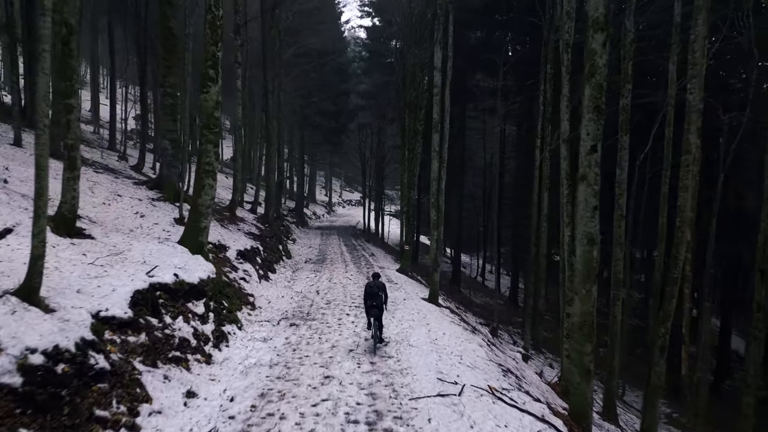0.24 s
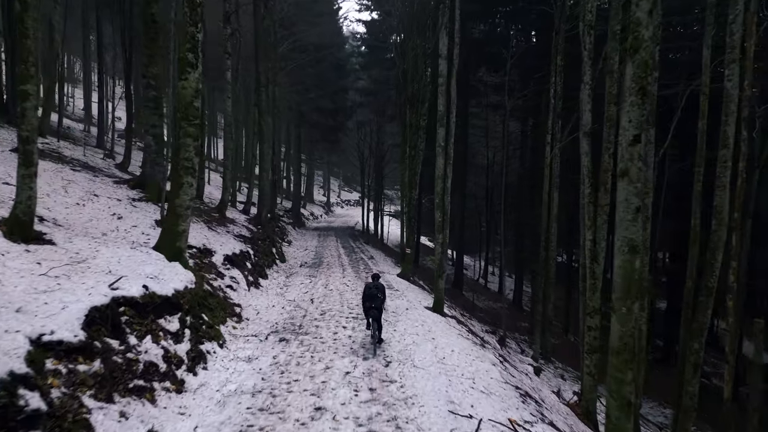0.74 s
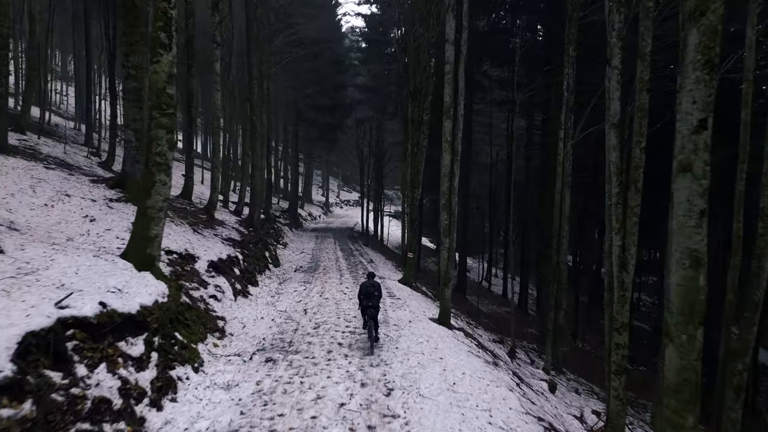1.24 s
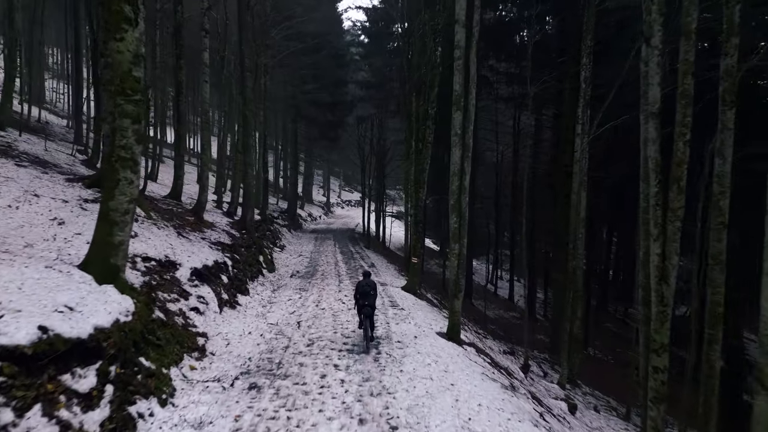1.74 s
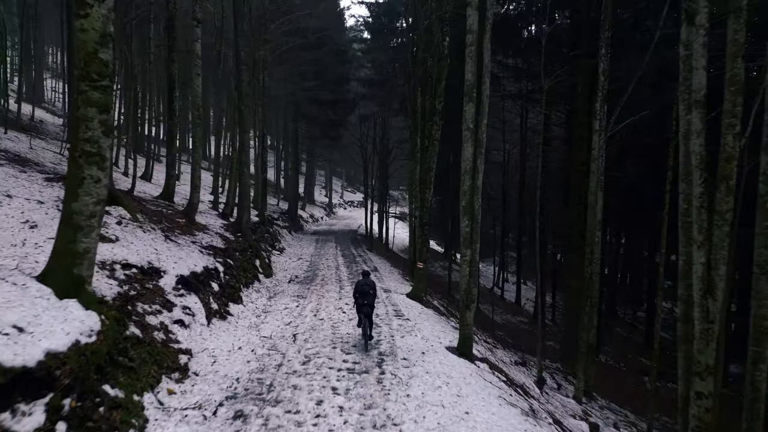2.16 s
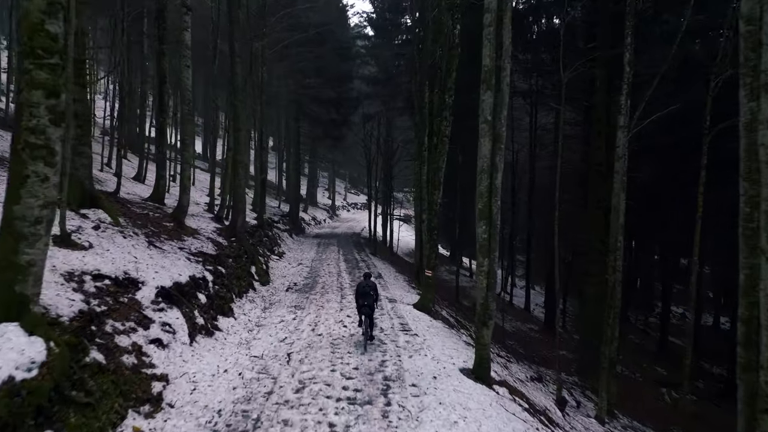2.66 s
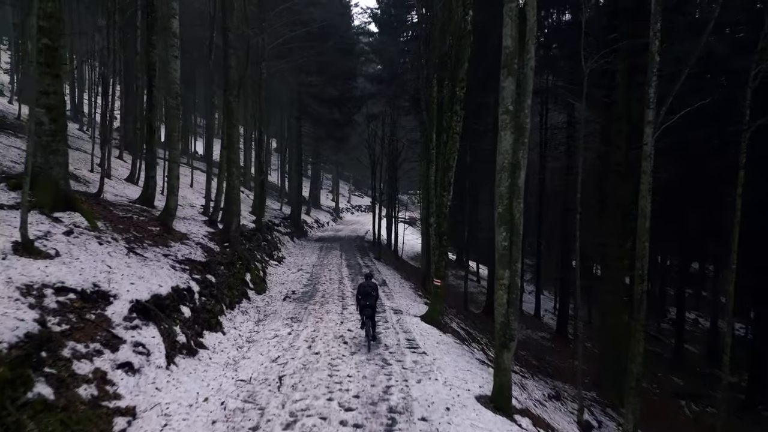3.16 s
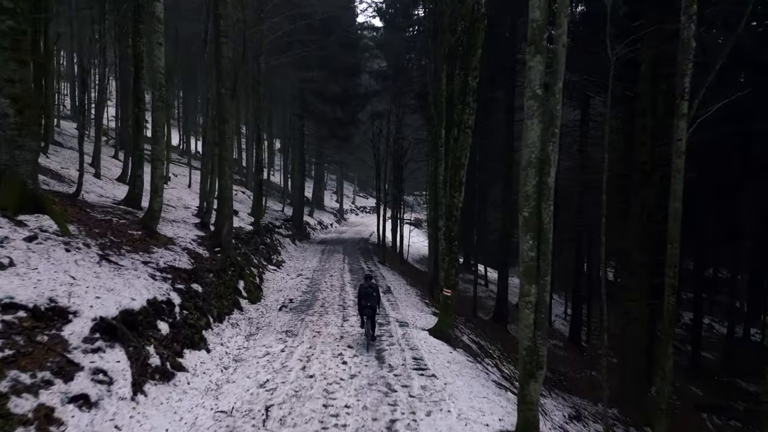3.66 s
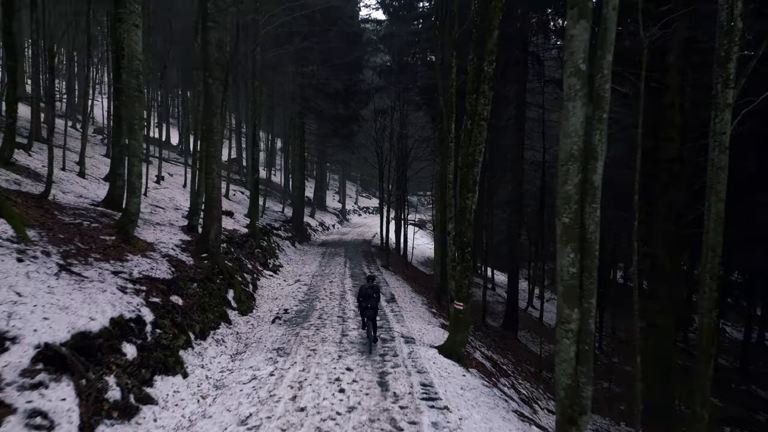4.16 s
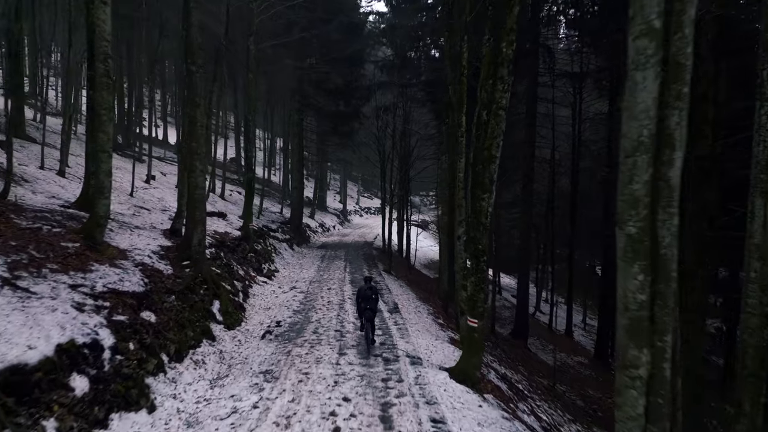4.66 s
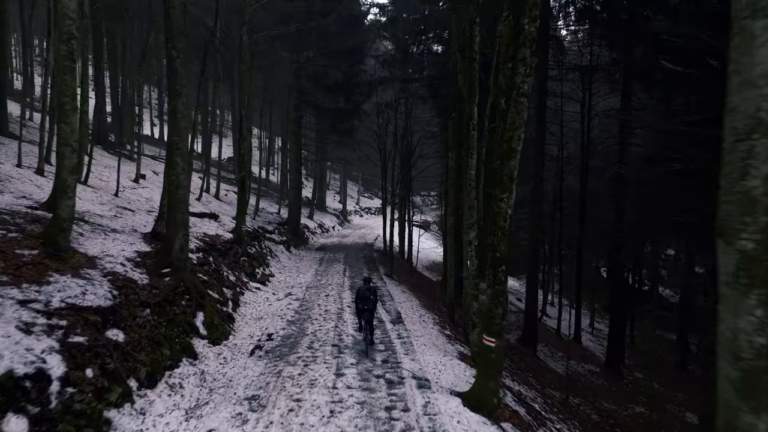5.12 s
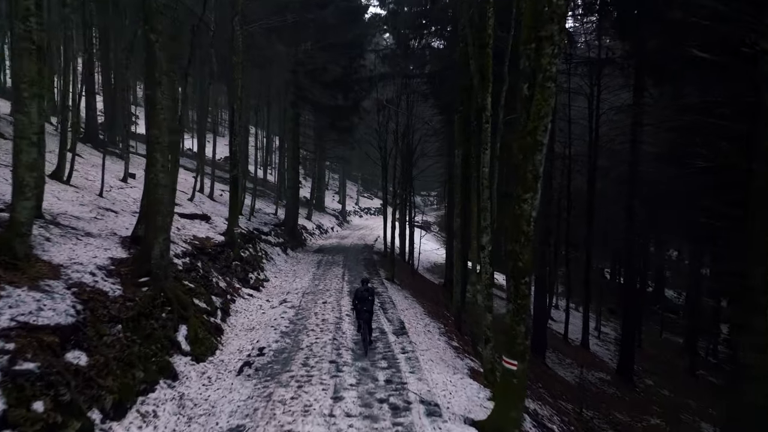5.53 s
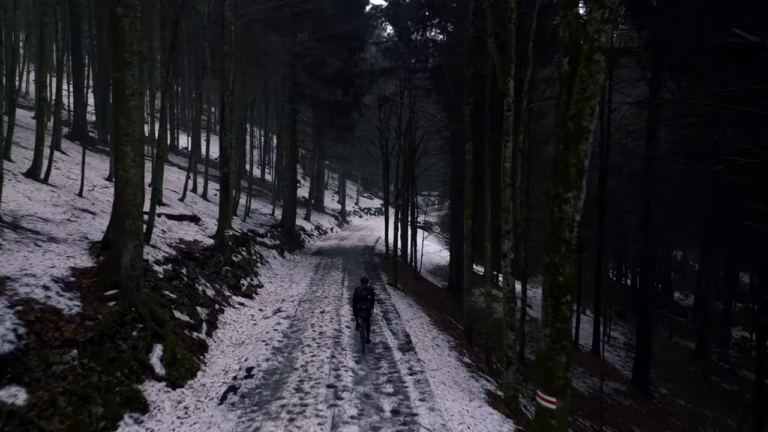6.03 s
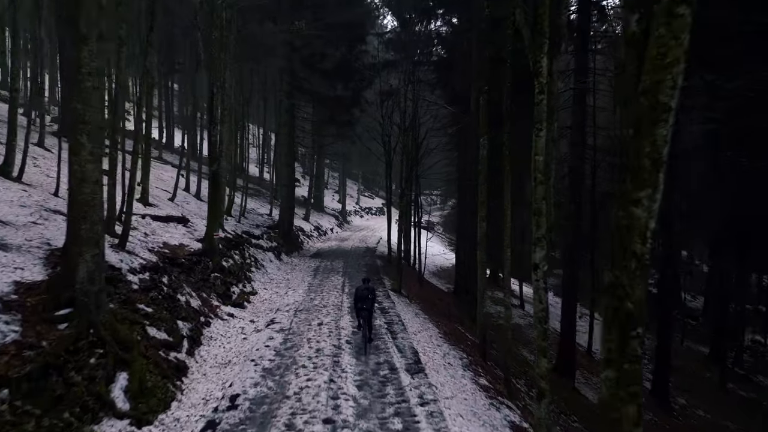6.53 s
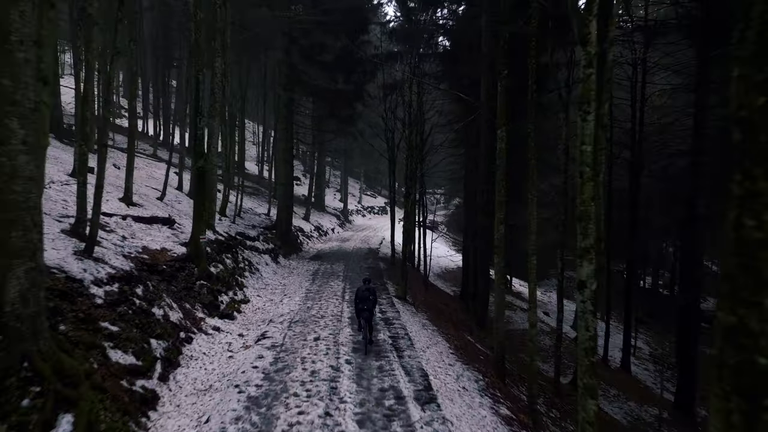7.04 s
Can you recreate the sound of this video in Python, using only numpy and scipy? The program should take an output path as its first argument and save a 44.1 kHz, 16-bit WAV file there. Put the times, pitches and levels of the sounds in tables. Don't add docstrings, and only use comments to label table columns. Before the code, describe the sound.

A bicycle rolls along a snowy forest track, heard from a small microphone on the frame. Heavy crunching and sharp crust cracks open loudly, then drop to a softer, continuous grainy hiss with fast freewheel ticking. Irregular low wind thumps buffet the microphone. Crunching grows again toward the end, with scattered ice snaps.

```python
import sys
import numpy as np
from scipy import signal
from scipy.fft import rfft, irfft
from scipy.io import wavfile
from scipy.ndimage import uniform_filter1d

SR = 44100
rng = np.random.default_rng(int(sys.argv[2]) if len(sys.argv) > 2 else 0)


def inscribe(sig):
    pcm = np.round(np.clip(np.atleast_2d(sig).T, -1, 1) * 32767)
    wavfile.write(sys.argv[1], SR, pcm.astype(np.int16))


def gain_from_db(level_db):
    decades = np.asarray(level_db, float) / 20
    return 10 ** decades


N = 321048

# start_s, load_db, coarseness_db
TRACK_LOAD = [(0.0, -25.5, 4), (0.32, -25, 5), (0.45, -28, 2.5), (0.6, -25.5, -0.5), (0.695, -28, 2),
              (0.72, -36, 2.5), (1.05, -36, 2), (1.27, -37, -0.5), (1.84, -38, 4.5), (2.3, -37.5, -2.5),
              (3.35, -36, 1), (3.6, -33.5, -1), (4.7, -33.5, 0.5), (5.2, -33, 0), (5.95, -29.5, -1.5),
              (6.3, -31.5, 1.5), (6.8, -33.5, -0.5), (7.28, -34.5, 3)]
# centre_s, half_length_s, load_db, coarseness_db
SNOW_PATCHES = [(0.16, 0.027, -3.5, -3), (.03, .03, 2.5, 0.5), (.11, 0.018, 0, 2), (.2, 0.033, 0.5, 2.5),
                (.33, 0.018, 0.5, 1.5), (.265, .012, -4.5, 11), (1.42, .02, -1.5, 2.5),
                (1.37, 0.039, 4.5, 3.5), (2.0, 0.045, 0.5, 3), (2.45, 0.055, -1.5, 0.5),
                (2.65, 0.028, 0, 3.5), (5.41, 0.015, 3, -2), (3.25, 0.042, -0.5, 0), (4.0, 0.034, 2, -0.5),
                (4.58, .04, -1, -1), (5.605, .02, -3, 1), (5.28, 0.034, -2.5, -2), (5.55, 0.063, -1, -0.5),
                (6.15, .05, 0.5, 1), (7.05, .05, 1, -1), (0.49, 0.012, -3, 2), (0.28, 0.012, -13, -4),
                (0.378, 0.028, -11, -1.5), (0.08, 0.047, 0, 2.5), (0.91, 0.017, 6, -8),
                (1.02, 0.036, 4.5, -0.5), (1.292, 0.026, 5.5, 6), (1.56, 0.031, 8, 3), (1.65, .025, -3, -8),
                (1.71, 0.083, 2.5, 0), (3.62, 0.016, -0.5, 4), (4.17, 0.03, -3, 0.5), (3.8, 0.02, 5, -3.5),
                (4.4, 0.025, 3, -0.5), (4.83, 0.029, -4.5, 1), (4.89, 0.025, 0.5, 1.5),
                (4.99, 0.022, 4.5, -1.5), (5.95, 0.054, -1.5, 6.5), (5.39, 0.09, 2.5, 1.5),
                (6.55, .025, -2.5, 2.5), (5.79, 0.081, 1, 1.5), (5.88, 0.042, -3, 1.5), (6.42, 0.01, 6, 0),
                (6.47, 0.017, -3.5, -2), (6.6, 0.093, 3.5, 1), (6.68, 0.012, -2.5, -2),
                (6.73, 0.015, 2, 5.5), (6.93, 0.021, 2, 1), (7.27, 0.0092, 3, 3.5)]
# start_s, level_db
LOOSE_POWDER = [(0.0, 2), (0.52, 0.9), (0.6, -4.5), (0.69, 3), (0.72, 1), (1.03, 1.4), (1.2, 0),
                (1.5, -0.6), (1.72, 1.5), (1.88, -1.5), (2.4, 1.3), (3.8, -0.8), (4.75, 1.3), (4.95, -2),
                (5.2, 1.3), (5.65, -1.3), (6.3, -0.5), (7.28, 0)]
# centre_s, half_length_s, level_db
SPRAY_PUFFS = [(.25, .02, 3), (.74, .02, -2.5), (.98, 0.018, -2), (1.11, 0.013, 3), (1.56, .025, -5),
               (1.8, .02, 2.5), (1.91, .015, -5), (2.39, .03, -4.5), (2.73, .02, -3), (3.01, .02, -2),
               (4.62, .03, -3.5), (5.65, .035, -3), (5.75, .02, 2)]
# frequency_hz, density_db (per Hz)
BODY_SPECTRUM = [(120, -16.5), (220, -5), (400, -1.5), (600, -2), (1000, -2), (1550, -6.5), (2500, -25.5)]
# frequency_hz, density_db (per Hz)
CRUST_SPECTRUM = [(700, -27.5), (1200, -8), (1700, -2), (2500, -2.5), (3100, -3.5), (3800, -6.5),
                  (5000, -13), (7000, -22.5)]
# frequency_hz, density_db (per Hz)
GRIT_SPECTRUM = [(2800, -39), (4200, 0), (5000, 2.5), (5900, 1), (6600, -8), (8500, -25)]
# frequency_hz, density_db (per Hz)
SPRAY_SPECTRUM = [(5000, -31.5), (6400, -8.5), (8000, -6.5), (9300, -4.5), (10200, -15.5), (12000, -19.5)]
# frequency_hz, density_db (per Hz)
POWDER_SPECTRUM = [(7000, -34), (9800, -16), (12300, -8.5), (14300, -4.5), (15700, -3.5)]
# centre_hz, width_hz, gain_db
HOUSING_MODES = [(6850, 680, 8.7), (7500, 600, 2.0), (8780, 460, 4.5)]
# centre_hz, width_hz, gain_db
CAPSULE_MODE = (13500, 250, 8.5)
# centre_hz, width_hz, gain_db
PORT_DIP = (3710, 490, -2)
# start_s, rate_per_s, level_db
TICK_RATE = [(0.0, 135, -42), (0.8, 133, -37.5), (1.4, 138, -39), (2.15, 160, -40.5), (2.45, 136, -36),
             (2.85, 143, -39), (3.1, 134, -38), (3.5, 136, -39.5), (4.1, 146, -44), (4.55, 163, -42.5),
             (5.45, 190, -38.5), (6.2, 175, -40.5), (7.28, 175, -42.5)]
# frequency_hz, density_db (per Hz)
PAWL_SPECTRUM = [(4000, -29), (6000, -6), (7000, 0), (9000, -1), (10500, -3.5), (12000, -2.5), (13500, -3),
                 (15500, -6.5)]
# start_s, level_db
AIR_STRENGTH = [(0.0, -15), (0.37, -28), (0.42, -24.5), (0.8, -37), (1.25, -29), (1.9, -27.5), (2.3, -31),
                (3.1, -39.5), (3.6, -33), (4.15, -33), (4.7, -32), (5.3, -29.5), (6.3, -28), (6.9, -28.5),
                (7.28, -33.5)]
# centre_s, half_length_s, strength_db, extra_flutter_db
GUSTS = [(0.06, 0.031, -13, -12), (.15, 0.034, -5.5, 5), (.2, .02, -4, 0), (.98, 0.023, -6, 2),
         (.83, .02, 0, 5), (3.54, .02, -6, -7), (4.0, 0.024, 6, -7), (4.36, .015, 1, 7.5),
         (4.73, .025, -3, -7), (4.97, 0.021, -1.5, 10), (5.035, 0.027, -5, -1), (5.37, .025, -8, 2),
         (5.71, 0.015, 2, 5), (5.79, 0.018, -6, 5), (6.03, 0.019, -5, 6), (6.13, .02, -8, 5),
         (6.18, 0.022, 0.5, 8), (6.65, .02, -6, 4), (7.075, .03, -8, 2), (2.63, .015, -6, 10),
         (1.54, .012, -4, -7), (0.24, 0.035, 4.5, 3), (0.41, 0.026, -12, 13), (0.5, .05, 4, 0),
         (0.59, .03, -10, -3), (0.65, 0.063, 6.5, -4), (1.13, 0.059, 1.5, 8), (1.21, 0.055, -8, -15),
         (1.57, 0.052, 2.5, 1.5), (1.67, 0.048, -11, 15), (1.9, 0.063, 7, -16), (2.01, 0.041, -17, 10),
         (2.35, 0.051, -19, 5), (2.42, .04, 12.5, -2.5), (2.57, 0.038, -1, -5), (2.68, 0.054, 10, 4.5),
         (2.82, 0.023, 8, -15), (3.12, 0.025, -7, -10), (3.28, 0.052, 9, 10.5), (3.36, 0.04, -4, 0),
         (3.43, .04, 9.5, -4), (3.04, 0.032, 8, -6), (4.16, 0.033, -2, 6.5), (4.43, 0.024, 8, -3),
         (4.58, 0.046, 2, 4.5), (4.85, 0.18, 5.5, 5), (5.23, 0.024, -23, 8), (5.9, 0.015, 6.5, 0),
         (6.51, 0.034, -11, -7), (6.83, 0.02, -12, -4)]
# frequency_hz, density_db (per Hz)
RUMBLE_SPECTRUM = [(12, -18), (20, -57), (48, 2.5), (75, 3), (117, -2.5), (200, -14.5), (260, -48.5),
                   (440, -120)]
# frequency_hz, density_db (per Hz)
FLUTTER_SPECTRUM = [(70, -17), (130, 5), (200, 1), (300, -4.5), (450, -18), (900, -40)]
# start_s, peak_db, swing_hz, length_cycles
EDDIES = [(0.005, -6.5, 59.6, 1.6), (0.238, -4, 117.4, 3.6), (0.312, -7, 85, 2.8), (0.468, -22, 86.1, 3.2),
          (0.63, -19, 88, 3.7), (1.128, -18, 115, 4.2), (1.484, -20, 61.9, 1.6), (1.564, -15, 104, 3.2),
          (2.226, -12.5, 133, 4), (2.278, -13, 124, 3.6), (3.281, -8.5, 105, 3.1), (3.42, -14, 106, 3.9),
          (3.589, -17, 96, 2.6), (3.858, -15.5, 106, 2.7), (3.935, -11, 81.4, 1.5), (4.251, -14, 89, 1.9),
          (4.384, -8, 111, 1), (4.508, -16, 114, 3.3), (4.577, -14, 75.4, 2.3), (5.13, -11, 92, 1.9),
          (5.269, -12, 110, 2.3), (5.469, -8.5, 83.4, 1.5), (5.513, -13, 90.6, 6.1),
          (5.665, -10.5, 87, 4.3), (5.876, -9, 80, 1.9), (6.065, -16, 90, 2.5), (6.243, -6.5, 130, 3.2),
          (6.344, -11, 94.2, 4.1), (6.74, -18, 68.6, 5.6), (7.132, -11, 92, 2.6)]
# start_s, peak_db, swing_hz, length_cycles
JOLTS = [(0.061, -25, 650, 4.8), (0.171, -26, 234, 6.2), (0.204, -22, 390, 4.6), (0.226, -19, 223, 3.4),
         (0.281, -7.5, 416, 5.7), (0.356, -12, 266, 3), (0.636, -26, 188, 2.6), (1.287, -20.5, 250, 2.1),
         (1.314, -16, 482, 3.8), (1.563, -18, 188, 3.7), (1.892, -14, 189, 2.3), (2.231, -17, 190, 2.9),
         (2.412, -22, 182, 4), (3.668, -19, 130, 3.4), (4.773, -19, 208, 2.8), (4.825, -12, 298, 1.4),
         (4.905, -18, 219, 1.9), (5.46, -15, 289, 2), (5.894, -20, 292, 4.9), (5.943, -23, 492, 4.3),
         (6.076, -18, 282, 5), (6.34, -14.5, 267, 2), (6.385, -13, 170, 2.5), (6.634, -24, 468, 2.3),
         (1.031, -27, 307, 4.5), (4.33, -14, 86, 1.4), (4.626, -13, 95, 1.9), (4.838, -11, 75, 2.5),
         (5.096, -17.5, 179, 2.8), (7.14, -13.5, 223, 1.8)]
# start_s, peak_db, swing_hz, length_cycles
AIR_PUFFS = [(0.749, -30, 61.9, 2.5), (0.899, -24, 67.3, 2.1), (1.359, -18, 105, 1.9),
             (1.599, -16.5, 61.9, 2.5), (1.74, -21, 61.9, 2.5), (2.099, -24, 61.9, 2.3),
             (2.679, -15, 112, 3), (2.949, -32, 91.5, 2.8), (3.049, -22, 78.1, 2.5),
             (3.739, -25, 67.3, 2.5), (3.899, -17, 88.8, 2.5), (4.049, -17, 67.3, 2.5),
             (4.449, -22, 83.4, 2.5), (4.797, -9, 86.1, 3), (4.874, -21, 64.6, 2.5),
             (4.919, -15, 96.9, 2.5), (4.959, -21, 91, 2.3), (4.999, -21, 61.9, 2.7),
             (5.605, -14, 61.9, 1.8), (5.749, -24, 67.3, 2.5), (5.979, -20, 67.3, 2.5),
             (6.149, -17, 61.7, 2.5), (6.449, -27, 72.7, 2.5), (6.579, -17, 61.9, 2.5),
             (6.849, -24, 121, 3), (6.949, -23, 143, 2.8), (7.049, -24, 105, 3), (7.219, -22, 70.0, 2.5)]
# start_s, peak_db, swing_hz, length_cycles
FURTHER_JOLTS = [
    (4.824, -20, 520, 2.9),
    (4.829, -15, 190, 2.6),
    (4.873, -22, 600, 3.6),
    (4.905, -19, 650, 3.0),
    (4.912, -16, 260, 2.3),
    (.455, -19, 240, 2.3),
    (5.44, -19.5, 170, 2.8),
]
# start_s, dull_peak_db, ring_hz, bright_peak_db
ICE_SNAPS = [(0.099, -6, 1150, -30), (0.322, -16, 716, -30), (0.406, -21, 861, -28), (0.504, -16, 703, -30),
             (0.904, -21, 977, -30), (0.994, -15.5, 2370, -30), (1.146, -18, 2550, -30),
             (1.252, -21, 2450, -30), (1.288, -14, 1030, -30), (1.557, -19, 945, -30),
             (2.238, -20, 1830, -30), (2.361, -21, 1780, -34), (3.444, -20.5, 939, -25),
             (3.789, -20, 1470, -30), (3.819, -16, 3220, -27), (4.019, -19, 1620, -30),
             (4.381, -21, 904, -32), (4.752, -20, 1610, -30), (4.939, -22, 2020, -32),
             (4.979, -14, 2980, -30), (4.994, -19, 1620, -30), (5.275, -24, 1010, -30),
             (5.363, -21, 1640, -34), (5.637, -19, 1660, -32), (5.749, -22, 1990, -30),
             (5.789, -14, 1890, -30), (5.809, -14, 1710, -30), (5.839, -17, 864, -30),
             (6.331, -19, 1880, -32), (6.593, -12.5, 1530, -35), (6.619, -18, 1690, -30),
             (6.829, -22, 1530, -25)]
# start_s, dull_peak_db, ring_hz, bright_peak_db
CRUST_CRACKS = [(0.148, -4, 1400, -31), (0.175, -3.5, 1070, -18.5), (0.28, 1, 1050, -19),
                (0.504, -28, 2140, -18.5), (0.658, -5, 2230, -26), (1.059, -11.5, 945, -26),
                (1.2875, -10, 1050, -20), (1.316, -14, 988, -22), (1.687, -13, 1770, -24.5),
                (1.93, -24, 766, -23), (2.101, -12.5, 2250, -30), (2.278, -17, 870, -24),
                (2.844, -13, 2910, -35), (2.942, -15, 1010, -26), (3.381, -19, 1390, -21.5),
                (3.617, -4.5, 2080, -38), (3.863, -14, 1550, -31), (3.918, -10, 2180, -35),
                (3.969, -7.5, 2030, -28), (4.225, -9.5, 766, -22.5), (4.357, -16, 883, -29),
                (4.667, -14, 1000, -23), (4.982, -23, 1630, -21), (5.039, -12, 2540, -19),
                (5.124, -7, 1980, -25), (5.393, -4, 2010, -28), (5.944, -4, 2010, -22),
                (5.984, -6, 1630, -30), (6.415, -7, 1750, -31), (7.152, -13, 1950, -31)]

MEAN_LOAD_DB, MEAN_AIR_DB = -33, -29
BODY_FOLLOWS, BODY_DB = 0.86, -36.5
SPRAY_FOLLOWS, SPRAY_COARSE, SPRAY_DB = 0.52, -0.077, -30.5
COARSE_DULLS = 0.15
CRUST_RISE, GUST_RISE = 0.72, 0.95
FLUTTER_FOLLOWS, FLUTTER_DB = 1.22, -35.5
EDDY_LEAD_S, EDDY_REACH_S, EDDY_STIRS_DB = 0.0082, 0.021, 5.5
EDDY_LIFTS = 0.16


def rms_one(x):
    return x / np.sqrt(np.mean(x ** 2) + 1e-20)


def in_time(rows):
    s, *columns = np.transpose(rows)
    return [np.interp(np.arange(N) / SR, s, column) for column in columns]


def swells(rows, rise):
    s, half_s, *columns = np.transpose(rows)
    t = np.arange(0, N, 64) / SR
    ago = (t[:, None] - s) / np.maximum(half_s, 0.005)
    bells = np.exp(-(ago / np.where(ago < 0, rise, 2 - rise)) ** 2)
    return [np.interp(np.arange(N) / SR, t, bells @ column) for column in columns]


def drift(rate):
    r = np.exp(-16 * np.pi * rate / SR)
    noise = rng.standard_normal(N // 8 + 4002)
    slow = signal.lfilter([1], [1, -2 * r, r * r], noise)[4000:]
    return np.interp(np.arange(N) / 8, np.arange(len(slow)), rms_one(slow))


def evened(x, span_s, share):
    power = uniform_filter1d(x ** 2 + 1e-6, int(span_s * SR))
    return rms_one(x / power ** (share / 2))


def colour(x, spectrum):
    size = 2 ** 14
    hz = np.arange(1, size // 2 + 2) * SR / size
    at, db = np.transpose(spectrum)
    gain_db = np.interp(np.log(hz), np.log(at), np.maximum(db, -70))
    cepstrum = irfft(np.log(gain_from_db(gain_db)))
    cepstrum[1:size // 2] *= 2
    cepstrum[size // 2 + 1:] = 0
    response = irfft(np.exp(rfft(cepstrum)))[:size // 2]
    return rms_one(signal.fftconvolve(x, response)[:N])


def peak(x, hz, width_hz, db):
    r = np.exp(-np.pi * width_hz / SR)
    poles = [1, -2 * r * np.cos(2 * np.pi * hz / SR), r * r]
    band = signal.lfilter([(1 - r * r) / 2, 0, (r * r - 1) / 2], poles, x)
    return x + (gain_from_db(db) - 1) * band


def grains(per_s, spread_db, hiss_db):
    sizes = gain_from_db(spread_db * np.minimum(rng.exponential(1, N), 5)) * rng.choice([-1, 1], N)
    snaps = sizes * (rng.random(N) < per_s / SR)
    return rms_one(snaps) + gain_from_db(hiss_db) * rng.standard_normal(N)


def patches(x, low_hz, high_hz, patchy_db, rate, count):
    edges = np.geomspace(low_hz, high_hz, count)
    lows = [signal.sosfilt(signal.butter(1, hz, fs=SR, output="sos"), x) for hz in edges]
    parts = np.diff([0 * x] + lows + [x], axis=0)
    return sum(gain_from_db(patchy_db * drift(rate)) * part for part in parts)


def snow_levels():
    load_db, coarse_db = np.add(in_time(TRACK_LOAD), swells(SNOW_PATCHES, CRUST_RISE))
    swing = load_db - MEAN_LOAD_DB
    body_db = BODY_DB + BODY_FOLLOWS * swing + coarse_db
    spray_db = SPRAY_DB + SPRAY_FOLLOWS * swing + SPRAY_COARSE * coarse_db
    spray_db = spray_db + in_time(LOOSE_POWDER)[0] + swells(SPRAY_PUFFS, CRUST_RISE)[0]
    return load_db, body_db, spray_db


def tyres():
    crust_db, body_db, spray_db = snow_levels()
    bite = 0.5 * drift(8.2) + 1.07 * drift(57)
    spurts = drift(440)

    body = patches(grains(1200, spread_db=0.5, hiss_db=-0.5), 660, 1340, patchy_db=3.0, rate=32, count=2)
    body = colour(body * gain_from_db(0.94 * bite + 0.42 * drift(35)), BODY_SPECTRUM)

    crust = patches(grains(2000, spread_db=1.5, hiss_db=3.5), 2200, 3400, patchy_db=2.5, rate=107, count=3)
    crust = colour(crust * gain_from_db(1.37 * bite + 0.79 * spurts + 0.75 * drift(36)), CRUST_SPECTRUM)

    grit = grains(3000, spread_db=2.8, hiss_db=-0.5)
    grit = colour(grit * gain_from_db(1.44 * bite + 1.7 * spurts + 1.0 * drift(19)), GRIT_SPECTRUM)

    spray = grains(3500, spread_db=3.0, hiss_db=6.0)
    spray = colour(spray * gain_from_db(0.25 * bite + 1.8 * spurts + 1.16 * drift(17)), SPRAY_SPECTRUM)
    for hz, width_hz, db in HOUSING_MODES:
        spray = peak(spray, hz, width_hz, db)

    powder = grains(3500, spread_db=2.0, hiss_db=3.0)
    powder = colour(powder * gain_from_db(0.29 * bite + 2.8 * spurts + 0.97 * drift(170)), POWDER_SPECTRUM)
    powder = peak(powder, *CAPSULE_MODE)

    plume = drift(5.5)
    powder_db = spray_db - 8.5 + 2.5 * plume + 0.15 * (crust_db - MEAN_LOAD_DB)
    layers = [(body, body_db - 0.4),
              (crust, crust_db - 0.3 - COARSE_DULLS * (body_db - crust_db)),
              (grit, 0.54 * crust_db + 0.52 * spray_db - 1.5),
              (spray, spray_db - 1.5 + 1.0 * plume),
              (powder, powder_db)]
    return sum(gain_from_db(db) * evened(layer, span_s=0.1, share=0.55) for layer, db in layers)


def freewheel():
    per_s, level_db = in_time(TICK_RATE)
    teeth = np.floor(np.cumsum(per_s * (1 + 0.04 * drift(25))) / SR)
    drops = np.diff(teeth, prepend=0) > 0
    sizes = gain_from_db(2.0 * rng.standard_normal(N) + 2.5 * (-1) ** teeth)
    t60_s = 0.012
    fade = signal.lfilter([1], [1, -gain_from_db(-60 / (t60_s * SR))], drops * sizes)
    ticks = peak(colour(fade * rng.standard_normal(N), PAWL_SPECTRUM), *CAPSULE_MODE)
    rough_db = snow_levels()[2] - SPRAY_DB
    return gain_from_db(level_db + 0.51 * rough_db) * ticks


def air_levels():
    gust_db, extra_db = swells(GUSTS, GUST_RISE)
    passings = [(s + EDDY_LEAD_S, EDDY_REACH_S, EDDY_STIRS_DB) for s, *_ in EDDIES]
    stir_db, = swells(passings, GUST_RISE)
    rumble_db = in_time(AIR_STRENGTH)[0] + gust_db + EDDY_LIFTS * stir_db
    flutter_db = FLUTTER_DB + FLUTTER_FOLLOWS * (rumble_db - MEAN_AIR_DB) + extra_db + stir_db
    return rumble_db, flutter_db


def wind():
    rumble_db, flutter_db = air_levels()
    lumps = drift(23.4)
    rumble = colour(rng.standard_normal(N) * gain_from_db(3.7 * lumps), RUMBLE_SPECTRUM)
    flutter = colour(rng.standard_normal(N) * gain_from_db(6.2 * lumps + 4.3 * drift(34)), FLUTTER_SPECTRUM)
    deep = colour(rng.standard_normal(N), [(15, -35), (35, -16), (55, -16.5), (90, -12.0), (200, -44.5)])
    deep_db = uniform_filter1d(rumble_db, int(0.4 * SR))
    gusts = gain_from_db(rumble_db + 1.0) * evened(rumble, span_s=0.053, share=0.5)
    gusts += gain_from_db(flutter_db - 0.5) * evened(flutter, span_s=0.06, share=0.9)
    return gusts + gain_from_db(deep_db - 8.0) * deep


def eddies(table, trim_db, slowing):
    out, t = np.zeros(N + 6000), np.arange(6000) / SR
    starts = rng.random(len(table))
    for (s, db, hz, cycles), start in zip(table, starts):
        age = 2.48 * t * hz / max(cycles, 0.5)
        turns = hz * t * (1 + slowing * (1 - np.minimum(age, 4.0) / 3))
        envelope = (age * np.exp(1 - age)) ** 3.17
        at = round(s * SR)
        out[at:at + 6000] += gain_from_db(db + trim_db) * np.sin(2 * np.pi * (start + turns)) * envelope
    return out[:N]


def cracks(table, fade_s):
    out, t = np.zeros(N + 4000), np.arange(4000) / SR
    bursts = rng.standard_normal((len(table), 4000))
    bursts = bursts * (1 - np.exp(-t / 0.00009)) * np.exp(-t / fade_s)
    bright_band = signal.butter(3, [3000, 9600], "band", fs=SR, output="sos")
    for (s, dull_db, hz, bright_db), burst in zip(table, bursts):
        dull = peak(burst, hz, 0.24 * hz, 0.5) - burst
        bright = signal.sosfilt(bright_band, burst)
        at = round(s * SR)
        out[at:at + 4000] += gain_from_db(dull_db - 11.5) * dull / np.abs(dull).max()
        out[at:at + 4000] += gain_from_db(bright_db + 5) * bright / np.abs(bright).max()
    return out[:N]


def scene():
    snow = tyres() + cracks(CRUST_CRACKS, fade_s=0.011)
    softer_snaps = np.subtract(ICE_SNAPS, [0, 0, 0, 13])
    snow += gain_from_db(7.0) * cracks(softer_snaps, fade_s=0.0056)
    air = wind()
    air += eddies(EDDIES, trim_db=-3, slowing=0.16)
    air += eddies(JOLTS, trim_db=-1.5, slowing=0.15)
    air += eddies(AIR_PUFFS, trim_db=-3.5, slowing=0.17)
    air += eddies(FURTHER_JOLTS, trim_db=-0.5, slowing=0.22)
    return (snow + freewheel() + air)[None]


def low_pass(x):
    return signal.sosfilt(signal.butter(12, 15710, fs=SR, output="sos"), x)


def record(dry):
    housed = peak(dry[0], *PORT_DIP)[None]
    mix = 0.98 * np.tanh(housed / 0.92)
    return low_pass(mix)


dry = scene()
out = record(dry)
inscribe(out)
```